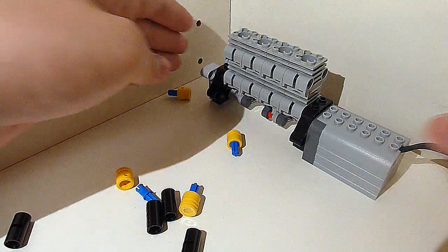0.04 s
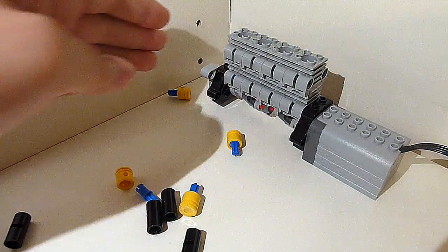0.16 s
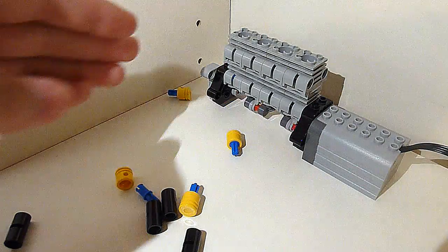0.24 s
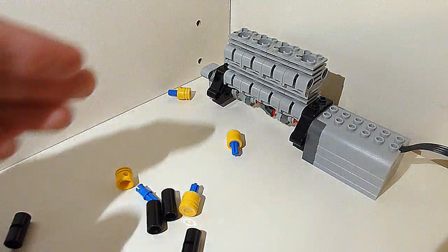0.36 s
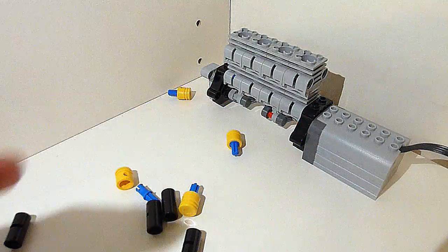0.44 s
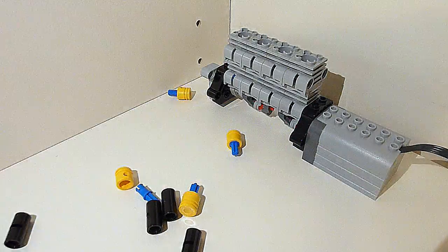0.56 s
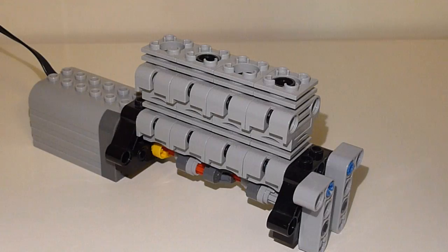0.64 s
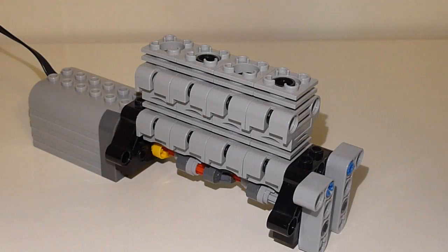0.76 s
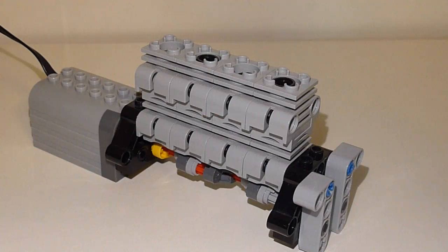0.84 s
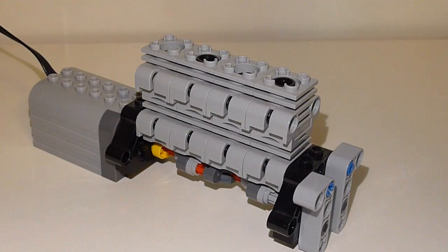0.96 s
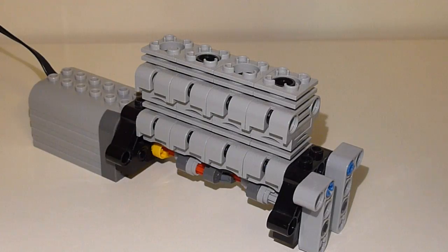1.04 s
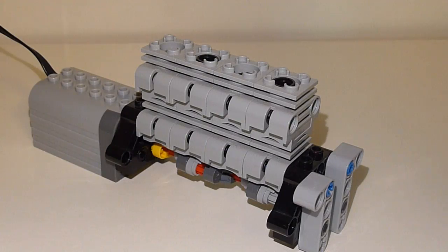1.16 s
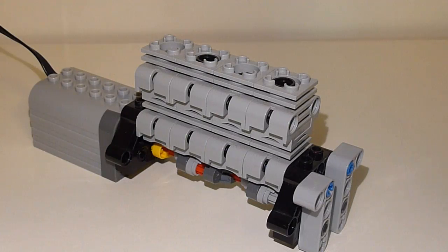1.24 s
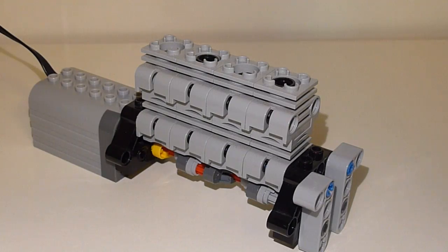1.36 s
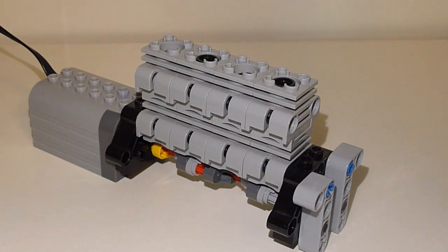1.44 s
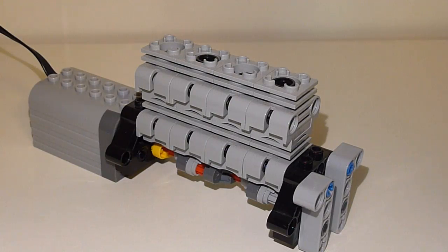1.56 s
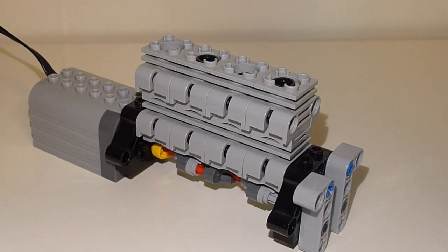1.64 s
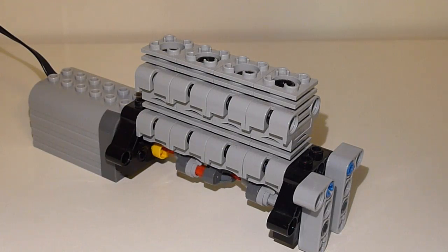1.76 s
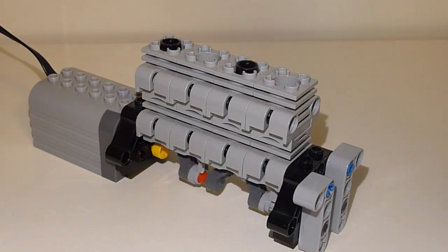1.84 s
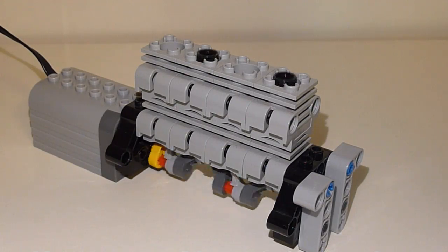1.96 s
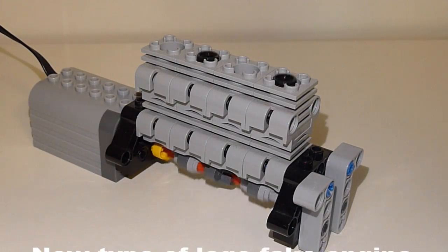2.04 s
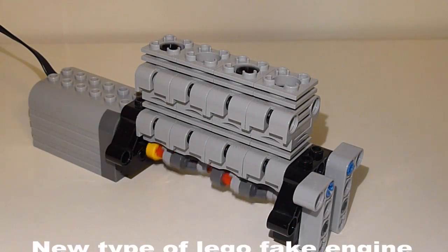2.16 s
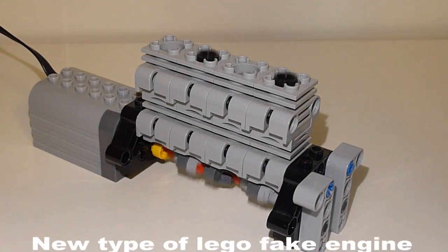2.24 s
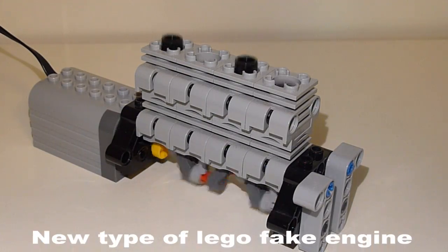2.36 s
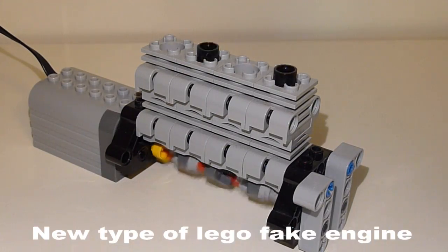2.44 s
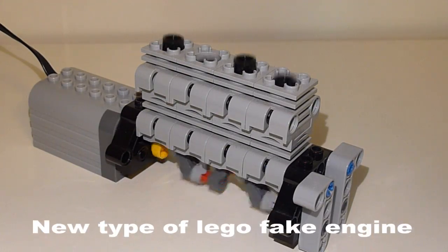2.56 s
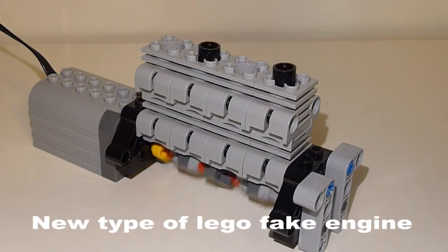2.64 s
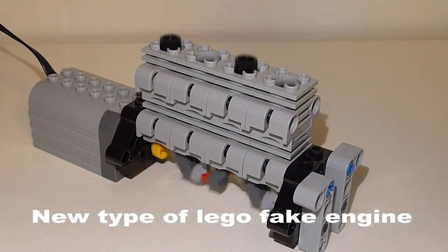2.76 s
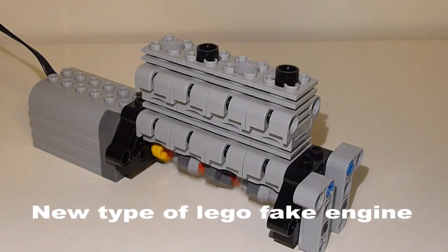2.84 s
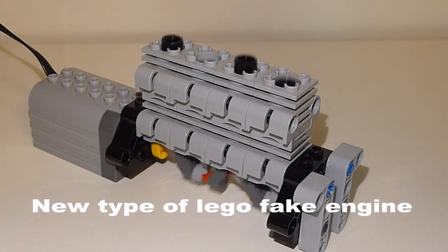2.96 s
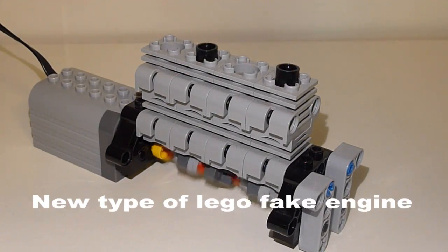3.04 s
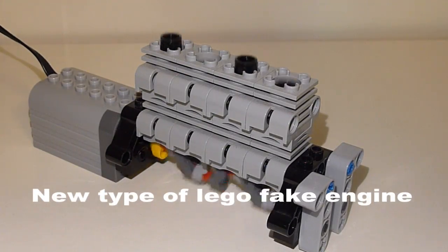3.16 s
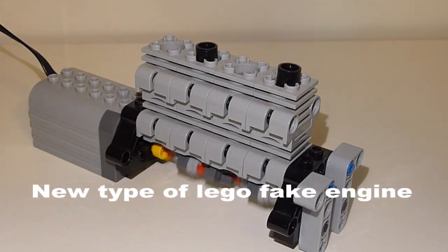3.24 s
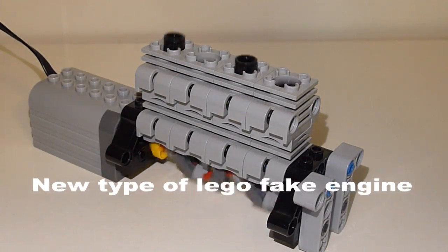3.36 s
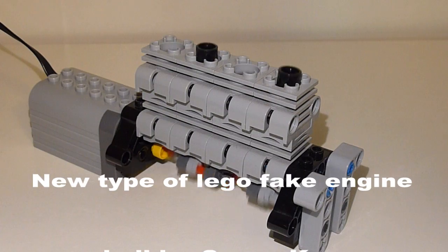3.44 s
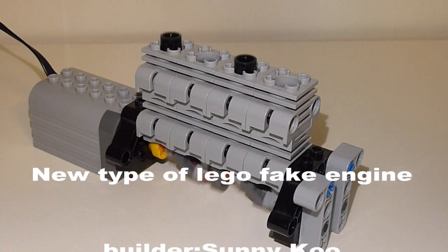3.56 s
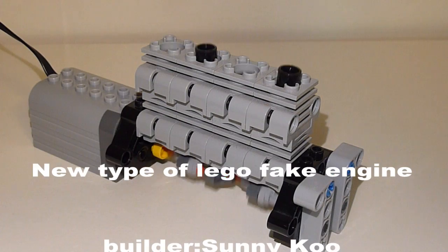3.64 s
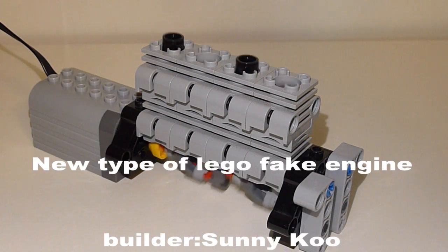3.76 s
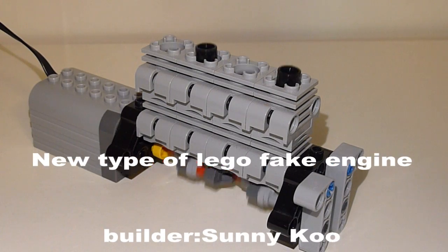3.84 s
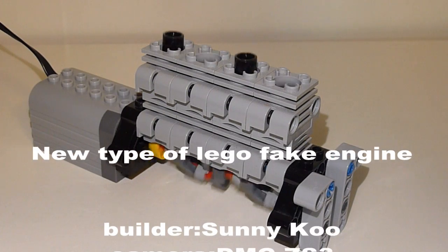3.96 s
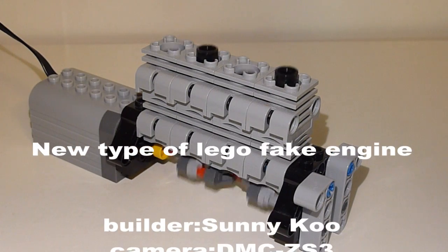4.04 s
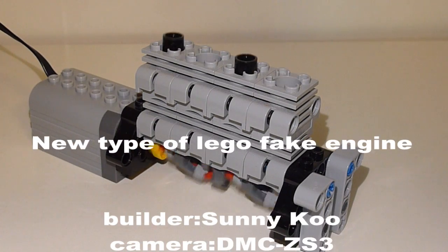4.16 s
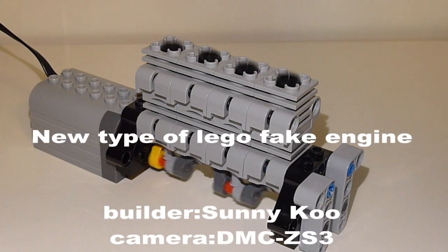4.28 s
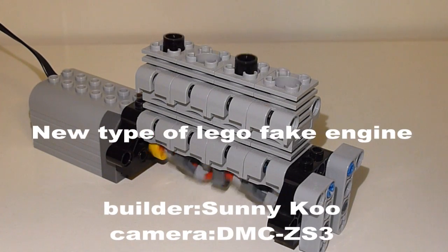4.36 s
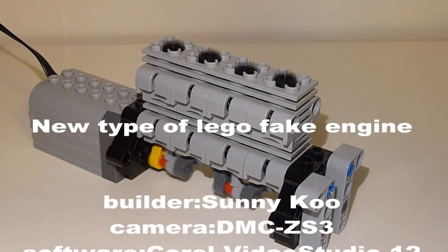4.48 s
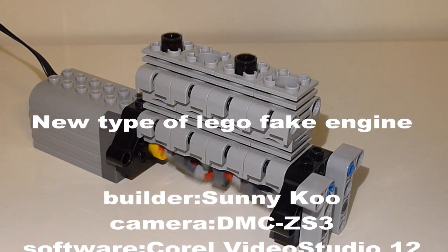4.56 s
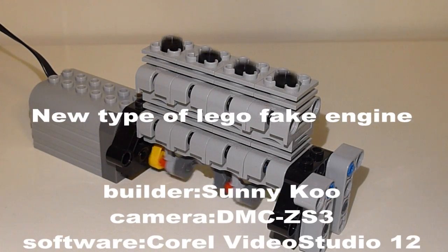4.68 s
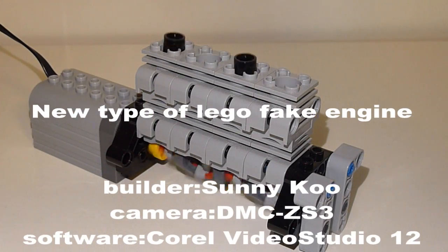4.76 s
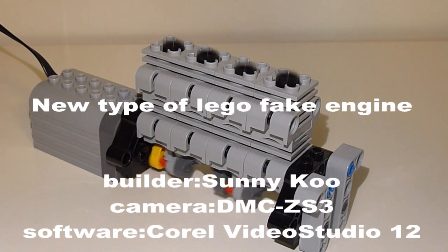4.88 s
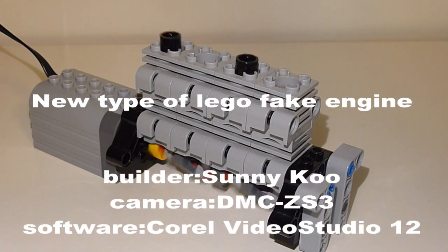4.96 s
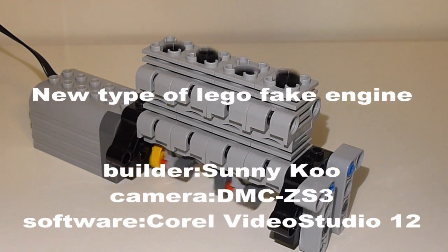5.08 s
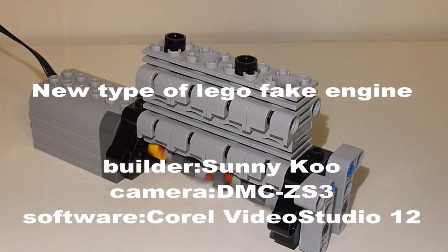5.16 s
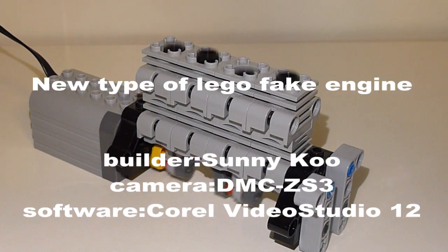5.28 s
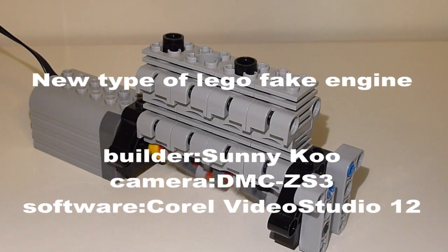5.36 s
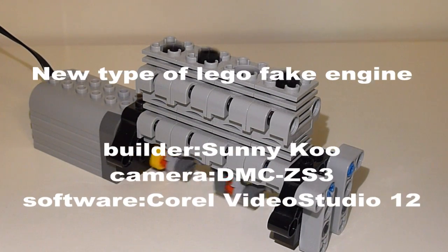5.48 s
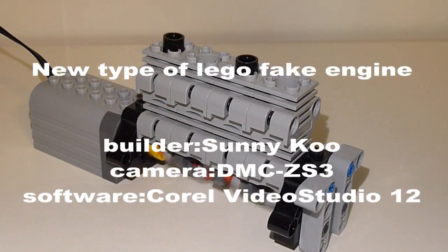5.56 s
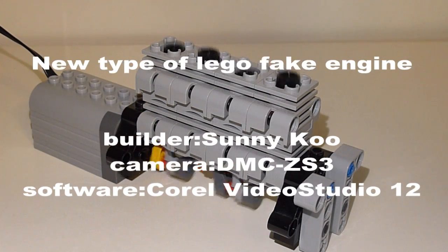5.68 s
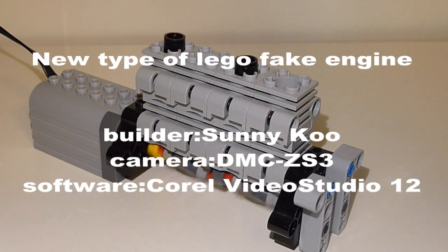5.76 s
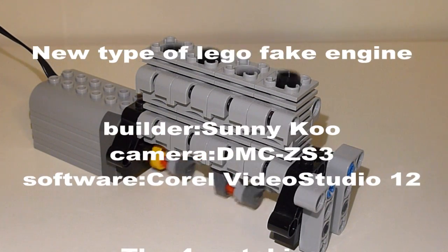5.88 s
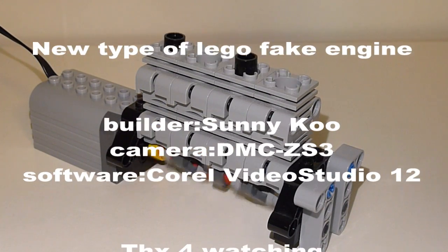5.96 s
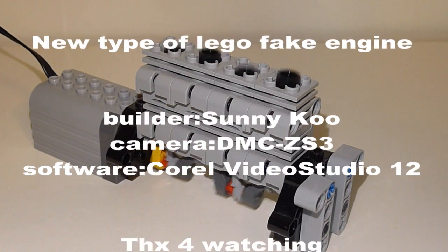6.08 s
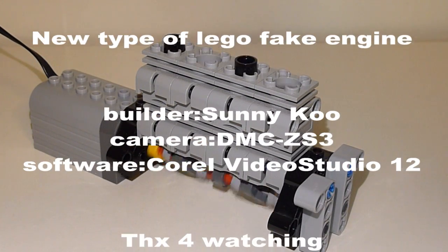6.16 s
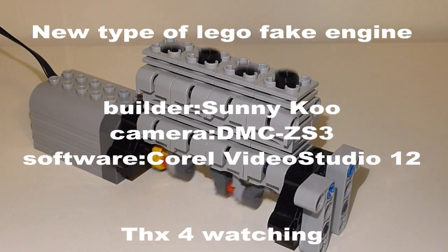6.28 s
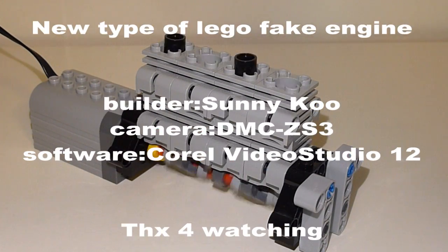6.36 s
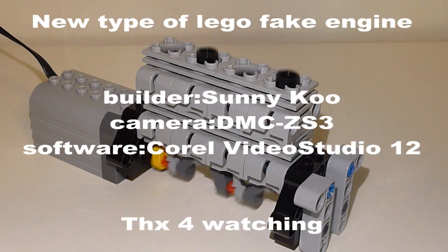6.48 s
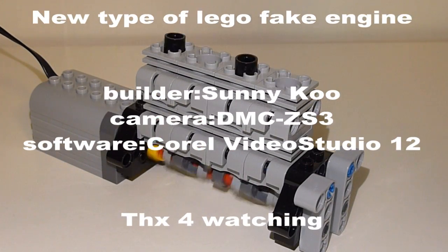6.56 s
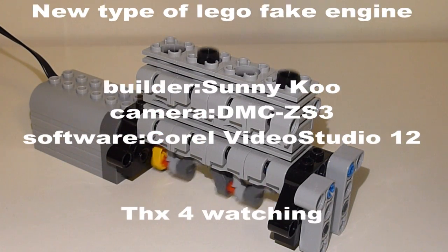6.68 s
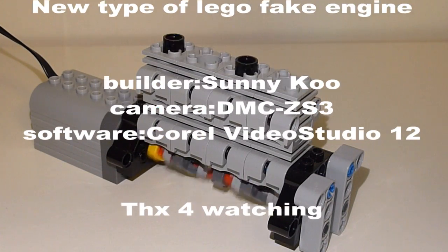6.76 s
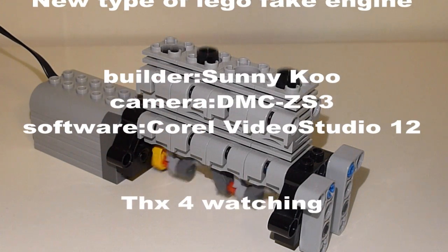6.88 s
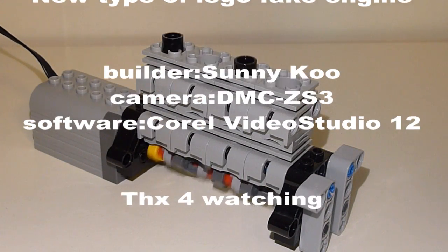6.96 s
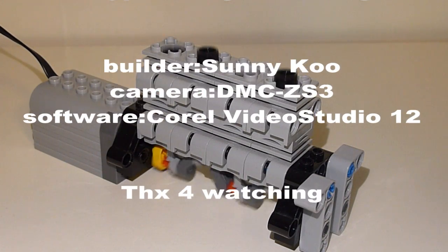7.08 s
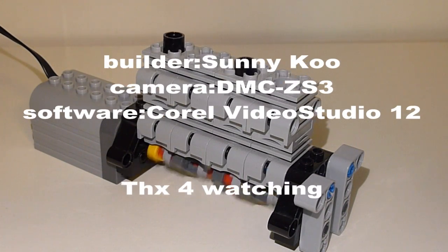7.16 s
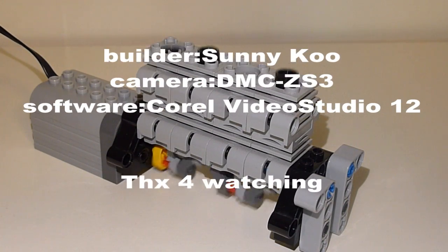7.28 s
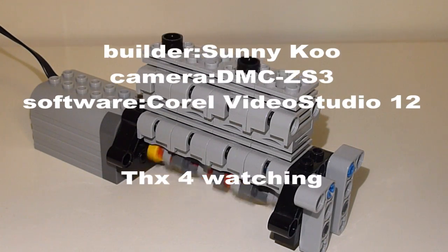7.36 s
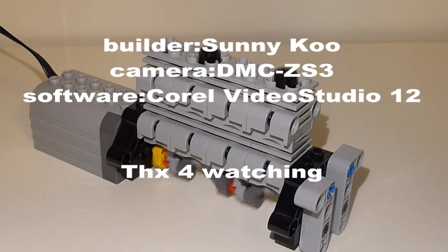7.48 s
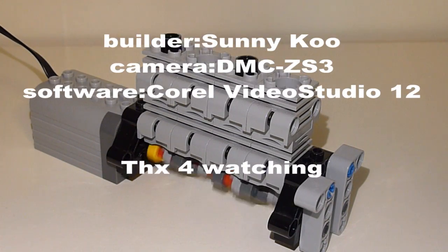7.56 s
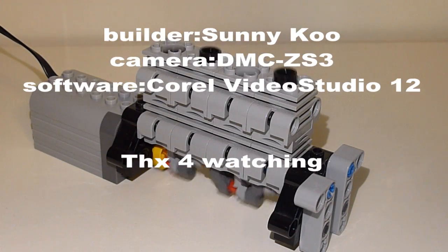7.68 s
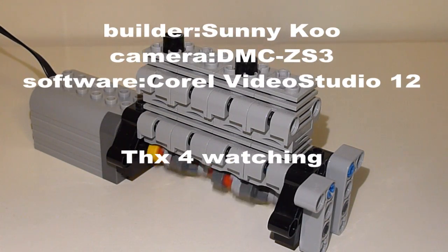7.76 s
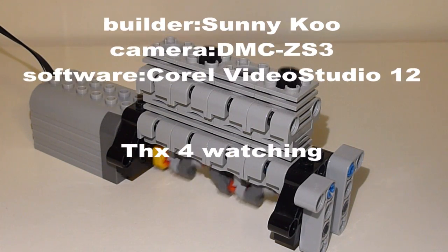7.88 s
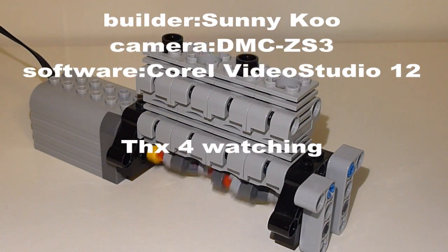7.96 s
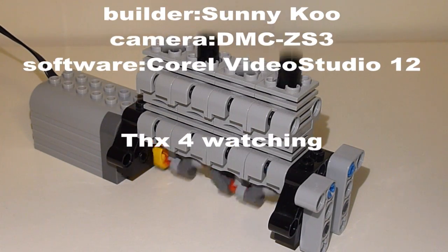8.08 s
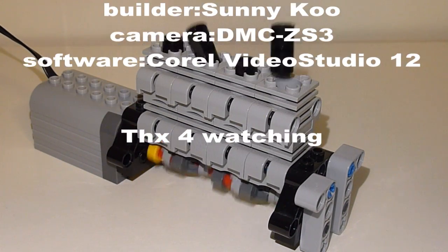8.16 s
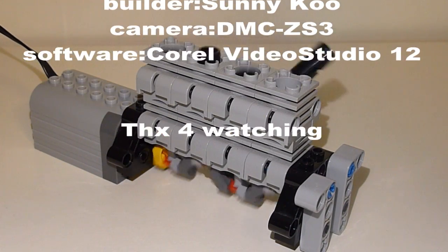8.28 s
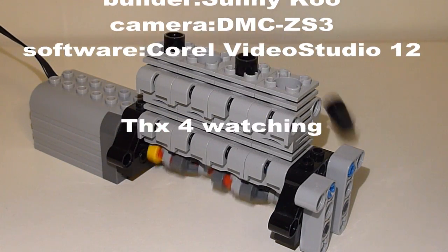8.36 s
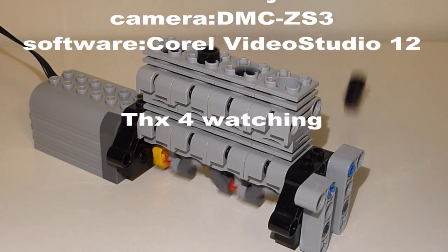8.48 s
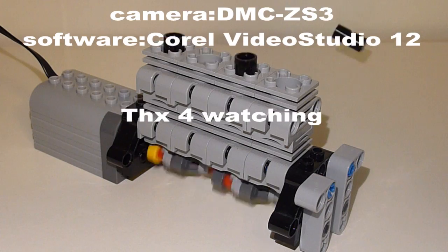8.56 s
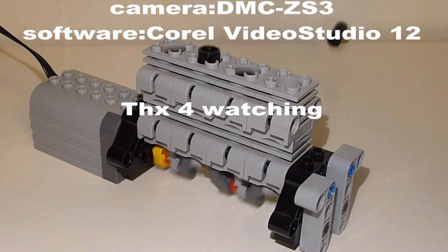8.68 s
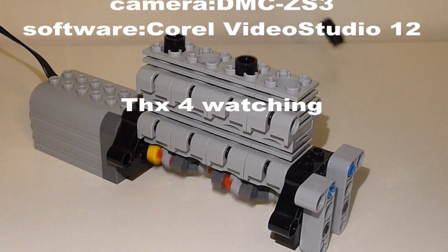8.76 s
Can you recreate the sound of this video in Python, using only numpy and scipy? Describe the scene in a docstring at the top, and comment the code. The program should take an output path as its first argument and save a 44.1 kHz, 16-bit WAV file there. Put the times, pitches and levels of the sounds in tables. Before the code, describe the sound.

Close stereo microphone at a table in a quiet room with faint low hum and hiss. From 0 to 0.7 seconds a small motor turns a plastic engine slowly: soft clacks about ten a second, a scratchy gear whirr with a thin wavering whine, and dull hand knocks near 0.1 and 0.6. It stops, leaving only the room. Around 1.7 a switch clicks a few times; from 1.9 the motor whirs up unevenly while hollow little tocks come from the control until 2.2. By 2.5 the engine is at speed: loud, bright, dry plastic clacks twenty times a second, often doubled by a lighter hit just before, with small ticks between and weak table thumps, over steady gear whirr. This holds with slight irregularity until 8.2, when a piston pops out with a sharp crack, then bounces hard at 8.5, 8.6 and 8.8 while the clatter runs on, rougher, to the end.

```python
"""On a table in a room, close up: a small electric motor turns the crankshaft of a plastic model engine.
It turns slowly, stops, a switch clicks and a control tocks; then the engine runs up and its pistons clack
twenty times a second, until one piston is thrown out and bounces on the table.
Blows are bursts of ticks ringing a body, plus a table thump; motor and room are coloured, patchy noise.
"""
import sys
import numpy as np
from scipy import signal
from scipy.fft import rfft, irfft
from scipy.io import wavfile
from scipy.ndimage import uniform_filter1d

SR = 44100
rng = np.random.default_rng(int(sys.argv[2]) if len(sys.argv) > 2 else 0)


def digitize_waveform(pressure):
    """Quantize a signal to 16-bit integers and store it at the path in sys.argv[1].

    Rows of a 2-D input are taken as channels; values are limited to [-1, 1].
    """
    field = np.atleast_2d(pressure).T
    bounded = np.clip(field, -1, 1)
    quanta = np.round(bounded * 32767).astype(np.int16)
    wavfile.write(sys.argv[1], SR, quanta)


N = 389403

# resonances of the engine block: (frequency [Hz], width [Hz], relative level [dB])
BLOCK_MODES = [(1628, 18.6, 6), (1889, 33, 6), (1994, 54, 3.5), (2268, 42, 3.5), (2640, 246, 2),
               (2860, 74, -0.5), (3250, 84, -3), (3460, 155, -1), (3660, 90, -2), (3816, 44, -1),
               (4140, 56, 3), (4470, 43, 2), (4540, 36, -2), (4770, 66, 0.5), (5180, 200, -2),
               (6046, 134, 1.5), (5770, 150, 1.5), (6560, 95, -2), (10200, 300, -3)]
# resonances of the table: (frequency [Hz], width [Hz], relative level [dB])
TABLE_MODES = [(158, 25, -24), (230, 28, -3), (261.2, 18, 4.5), (287, 22, -5), (377.5, 43, -1.5),
               (490, 13.5, -2.5), (533, 7.2, 6), (785, 89, -6.5), (1041, 37, -7.5)]
# resonances of the control's housing: (frequency [Hz], width [Hz], relative level [dB])
KNOB_MODES = [(1450, 130, 6.5), (2320, 790, -1.5), (3580, 500, 2.5)]


def gain_of(db):
    """Decibels to an amplitude factor."""
    return 10 ** (np.asarray(db) / 20)


def evened(x):
    """Scales to rms 1."""
    return x / np.sqrt(np.mean(abs(x) ** 2) + 1e-20)


def read(points, hz):
    """Reads a spectrum on a log-frequency axis."""
    f, value = np.transpose(points)
    return np.interp(np.log(hz + 1), np.log(f + 1), value)


def causal(db):
    """Minimum-phase response for gains in dB along the last axis, so nothing rings ahead of the blow."""
    log_gain = np.log(gain_of(np.maximum(db, -100)))
    whole = np.concatenate([log_gain, log_gain[..., -2:0:-1]], -1)
    return np.exp(np.conj(signal.hilbert(whole)))[..., :log_gain.shape[-1]]


def ringing_db(modes, hz, between_db):
    """Adds the power of a set of resonances to a flat bed; widths are at least 6 Hz."""
    power = sum(gain_of(2 * db) / (1 + (2 * (hz - f) / max(w, 6)) ** 2) for f, w, db in modes)
    return 10 * np.log10(power + gain_of(2 * between_db))


def paired(a, b, hz):
    """Mixes two spectra into two microphone ports with a frequency-dependent likeness."""
    # (frequency [Hz], left-right correlation [0..1])
    likeness = [(60, 1), (110, 0.97), (200, 0.99), (380, 0.99), (700, 0.96), (1290, 0.88), (2380, 0.83),
                (4400, 0.67), (8120, 0.016), (15000, 1)]
    apart = np.arccos(np.clip(read(likeness, hz), 0, 1)) / 2
    mid, side = a * np.cos(apart), b * np.sin(apart)
    return np.array([mid + side, mid - side])


def noise(tone_db, patchy_db, size=1024):
    """Stereo noise of rms 1 with drifting loud and soft patches; tone_db is a function of Hz."""
    hz = np.fft.rfftfreq(size, 1 / SR)
    a, b, c, d, patches = rng.standard_normal((4 * N // size + 5, len(hz), 5)).T
    patches = uniform_filter1d(patches, size=10, axis=0)
    patches = evened(uniform_filter1d(patches, size=8, axis=1))
    level_db = tone_db(hz)[:, None] + patchy_db * patches
    z = paired(a + 1j * b, c + 1j * d, hz[:, None]) * gain_of(level_db)
    return evened(signal.istft(z, nperseg=size, noverlap=3 * size // 4)[1][:, :N])


def rattles(t, draw, rattle_ms, hurry, rise_s, spread_db, tail_db, tail_s, sudden):
    """Loose parts tick at random, gathered into sharp snaps that die away over a weak tail."""
    snaps_per_s, snap_s, between_snaps = 280, 0.0013, 0.81
    # a larger power holds the rattle and ends it suddenly
    fall = np.exp(-(1000 * t * hurry / np.maximum(rattle_ms, 1)) ** sudden)
    ticks = (draw[0] < .12) * gain_of(-spread_db * np.log(draw[1] + 0.0079)) * np.sign(draw[2] - .5)
    snaps = (draw[4] < snaps_per_s / SR) * draw[2] + (t == 0)  # the first at the blow itself
    snaps = signal.lfilter([1], [1, -np.exp(-1 / (snap_s * SR))], snaps) + between_snaps
    envelope = snaps * fall + gain_of(tail_db) * np.exp(-t / tail_s)
    return ticks * envelope * (1 - np.exp(-t * hurry / rise_s))


def rung(near, side, hz, bright_hz, focus_db, focus_width, body):
    """The rattle rings its body, with a broad emphasis around one pitch."""
    # colour of a clack: (frequency [Hz], relative level [dB])
    clack_tone = [(300, -49.5), (1000, -11), (2000, -9), (4000, 1.5), (6500, -2.5), (10000, -7.5),
                  (12500, -14), (14500, -40.5)]
    tone_db = read(clack_tone, hz) + ringing_db(body, hz, -5.0)
    tone_db = tone_db + focus_db / (1 + (np.log((hz + 1) / bright_hz) / focus_width) ** 2)
    clack = irfft(paired(rfft(near), rfft(side), hz) * causal(tone_db))
    power = uniform_filter1d(clack.mean(0) ** 2, size=100, axis=1)
    return clack / (2.4 * np.sqrt(power.max(1, keepdims=True)))  # the strongest 2 ms sets the level


def thumps(t, hz, draw, push_s, dull_hz, damp_s):
    """A push of random grain swells over some ms, as the table takes time to move, and rings its modes."""
    push = (draw - .5) * t * np.exp(-t / push_s)
    tone_db = ringing_db(TABLE_MODES, hz, -51) - 40 * (hz < 100)
    tone_db = tone_db - 10 * np.log10(1 + (hz / dull_hz) ** 6)  # soft blows move only the low modes
    thump = irfft(rfft(push) * causal(tone_db)) * np.exp(-t / damp_s)  # a hand on the wood damps it
    return thump / abs(thump).max(1, keepdims=True)


def hits(rows, rise_s, spread_db, focus_db, focus_width, tail_db, tail_s, thump_db, trim_db, pan_db,
         push_s, linger, dull_hz=2000, damp_s=.3, sudden=1.04, body=BLOCK_MODES):
    """Each hit is a short rattle ringing its body, then a slower thump in the table."""
    s, db, bright_hz, low_db, rattle_ms = np.array(rows).T[:, :, None]
    t, hz = np.arange(4096) / SR, np.fft.rfftfreq(4096, 1 / SR)
    draw = rng.random((len(rows), 5, 4096)).transpose(1, 0, 2)
    hurry = gain_of(linger * (np.median(db) - db))  # light blows start and settle sooner
    near = rattles(t, draw, rattle_ms, hurry, rise_s, spread_db, tail_db, tail_s, sudden)
    side = near * np.sign(draw[3] - .5)
    clack = rung(near, side, hz, bright_hz, focus_db, focus_width, body)
    thump = thumps(t, hz, draw[3], push_s, dull_hz, damp_s)
    sway_db = pan_db + 0.98 * (draw[1, :, :1] - .5)  # each part sits elsewhere along the block
    sound = clack * gain_of([sway_db / 2, -sway_db / 2]) + gain_of(low_db + thump_db) * thump
    sound = gain_of(db + trim_db) * sound
    out = np.zeros((2, N + 4096))
    for k, start in enumerate(np.round(s[:, 0] * SR).astype(int)):
        out[:, start:start + 4096] += sound[:, k]
    return out[:, :N]


def strokes():
    """Rows for hits(), the listed clacks plus an ordinary one at each stroke left free, and leads in ms."""
    # clacks that stand out: the slow run, the run-up, the hardest at full speed, the uneven ones with a
    # piston gone: (time [s], level before trim [dB], brightest [Hz], nominal rattle [ms],
    # lead of the lighter piston [ms], negative if it trails)
    standouts = np.array([(0.0044, -26.5, 3640, 5.8, -1), (0.0836, -34, 3620, 9.4, 2),
                          (0.193, -29.5, 3180, 8, 1.5), (0.2755, -28.5, 3190, 9.6, -2),
                          (0.378, -25, 3680, 5.8, 0.5), (0.4813, -33, 4010, 10, -2.5),
                          (0.56, -32, 3210, 12, -0.5), (0.6712, -30, 3170, 9, -4),
                          (1.871, -35, 2900, 5.2, 0.5), (2.121, -31, 5700, 8, -3), (2.167, -28, 3000, 5, 2),
                          (2.3106, -36, 2950, 11, 2.5), (2.3804, -34, 4540, 13, 0),
                          (2.438, -20.5, 3700, 7.7, 0), (2.4733, -26.5, 2570, 14, -1),
                          (2.498, -22.5, 2820, 12, 3.5), (2.5509, -17.5, 3930, 11, 5),
                          (2.5993, -17.5, 4630, 7.9, 5), (2.7063, -17.5, 3350, 8.8, 9),
                          (2.75, -18, 3920, 10, 4.5), (2.8064, -16.5, 5990, 6.9, 8),
                          (2.8518, -15.5, 3420, 5.1, 1.5), (2.8997, -19, 4780, 7, -0.5),
                          (2.9488, -17.5, 3960, 6.1, 3), (2.996, -19.5, 4200, 14, 8.5),
                          (3.049, -17.5, 4910, 7, 3.5), (3.1033, -17, 5920, 6.5, 5),
                          (3.2011, -17, 4370, 7.0, 2.5), (3.3017, -20, 3530, 12, 7.5),
                          (3.397, -16, 4180, 11, 0.0), (3.4463, -17, 6270, 8.2, 1),
                          (3.501, -14, 6010, 4.7, 2.5), (3.5458, -21, 3120, 9.4, 12),
                          (3.5947, -17, 4700, 6.6, 6.5), (3.6452, -18, 4570, 6.9, 5),
                          (3.6949, -18.5, 4520, 12, 9), (3.7437, -15.5, 3680, 6.1, 2.5),
                          (3.798, -18, 3010, 9.0, 8.5), (3.8455, -15, 3850, 5.1, 4),
                          (3.896, -18.5, 3080, 6.6, 2.5), (3.9422, -18, 4570, 7.4, 9),
                          (4.0463, -16, 3940, 5.2, 4.5), (4.0978, -18, 5880, 6.1, 11),
                          (4.147, -15.5, 4470, 8.1, 4), (4.193, -15, 4160, 4.1, 4.5),
                          (4.3436, -16, 5960, 10, 0.5), (4.4424, -18.5, 3750, 8.7, 9),
                          (4.4942, -18.5, 4600, 9.1, 4.5), (4.5434, -15.5, 3620, 7.4, 4.5),
                          (4.5942, -15.5, 3400, 8.4, 3), (4.6427, -20.5, 3920, 9.1, 4),
                          (4.6947, -16.5, 4700, 8.5, 0.0), (4.7432, -18, 3680, 9.6, 6),
                          (4.791, -17, 4160, 11, -0.5), (4.8473, -19, 4740, 12, 10),
                          (4.8924, -17, 4590, 6.9, 5), (4.944, -21.0, 4130, 13, 6.1),
                          (4.991, -15, 4150, 9.7, 0.0), (5.192, -19, 4200, 9.2, 2),
                          (5.2935, -17.5, 2860, 14, 1.5), (5.3409, -17, 4360, 9.1, 1),
                          (5.397, -16, 3490, 6.1, 6), (5.44, -17, 3730, 7.4, 4),
                          (5.4914, -20.5, 2690, 12, 4), (5.5428, -17.5, 3660, 7.6, 8.5),
                          (5.5926, -15.0, 4650, 7.8, 0.0), (5.6414, -16, 4500, 5.1, 7),
                          (5.6905, -18.5, 4160, 9.8, 8.5), (5.7886, -19.5, 2710, 15, 8.5),
                          (5.8937, -16, 4200, 10, 3.5), (5.9384, -18.5, 3700, 14, 3),
                          (5.9933, -16.5, 5880, 6.8, 5), (6.0379, -17, 4420, 8.2, 5.1),
                          (6.0893, -15, 4180, 6.6, 0.5), (6.1426, -17.5, 5080, 8.8, 4.9),
                          (6.1904, -17.5, 4160, 6.1, 2), (6.2387, -17, 4330, 7.9, 9.5),
                          (6.2966, -19.5, 3370, 6.4, 11.5), (6.338, -19.5, 2760, 12, 5.5),
                          (6.3884, -20, 3600, 5.6, 12), (6.4416, -15, 3790, 5.9, 10),
                          (6.487, -17, 4240, 7.9, 10.0), (6.5891, -16.5, 5790, 7.4, 4),
                          (6.636, -16.5, 3460, 8.1, 0.5), (6.6907, -17, 5750, 9.6, 0.5),
                          (6.7888, -17, 3480, 7.3, 2), (6.837, -19.5, 4480, 8.0, 5.3),
                          (6.8884, -17.5, 4220, 8.6, 1), (6.9353, -18, 5810, 6.2, 8.5),
                          (6.9889, -19.5, 2860, 11, 3.5), (7.0387, -17, 4480, 7.4, 5.0),
                          (7.089, -17, 4220, 8.2, 2), (7.1364, -18.5, 4390, 10.0, 6),
                          (7.1858, -17, 4160, 7.1, -0.5), (7.2352, -17, 5840, 10.4, 5),
                          (7.2889, -14.5, 4200, 5.8, 1), (7.336, -17.5, 2760, 9.1, 4),
                          (7.389, -18, 3380, 7.5, 5.5), (7.4847, -16, 4170, 8.9, 0.0),
                          (7.5361, -16, 4480, 7, 2), (7.5907, -18.5, 4670, 8.3, 2.5),
                          (7.638, -17.5, 3670, 7.9, 7), (7.793, -15, 4000, 3.5, 7.5),
                          (7.837, -15.5, 2800, 6.1, 9.5), (8.0352, -17, 4870, 9.1, 2.5),
                          (8.193, -15, 4770, 9.4, 7), (8.2966, -19, 3000, 66, 2),
                          (8.332, -19, 4230, 12, 0.5), (8.3883, -19.5, 4640, 7.7, 2.5),
                          (8.4368, -17.5, 3620, 15, 3), (8.4814, -19, 4110, 11, -1),
                          (8.5807, -22.5, 2900, 11, 3), (8.6391, -16, 4070, 9.4, 1),
                          (8.6808, -18.5, 3880, 8.1, -3.5), (8.741, -20.5, 4440, 13, 6),
                          (8.7834, -20, 2730, 9.4, 2)])
    # range in which an ordinary clack is brightest at one block mode: (lowest [Hz], highest [Hz])
    lowest_hz, highest_hz = (2600, 6190)
    first_stroke_s, stroke_s, count = 2.548, .04986, 113  # at full speed a pair of pistons drops at every stroke
    loose_s = .0015  # play in the cranks scatters the timing
    usual_db, scatter_db = -18.5, 1.0  # level of an ordinary clack before trim
    rattle_ms, shorten = 12.7, 0.5  # a harder clack spends the same energy in a shorter rattle
    average_lead_ms = 2.2  # two pistons share a stroke; the lighter lands this much earlier on average
    under_db, under_scatter_db = -19, 3  # thump below the clack, before its own trim

    due = first_stroke_s + stroke_s * np.arange(count)
    late, hard = rng.standard_normal((count, 2)).T
    pick, ahead = rng.random((count, 2)).T
    modes = np.array([f for f, _, _ in BLOCK_MODES if lowest_hz < f < highest_hz])
    lead_ms = 2 * average_lead_ms * ahead
    usual = np.transpose([due + loose_s * late + lead_ms / 1000,
                          usual_db + scatter_db * hard,
                          modes[(pick * len(modes)).astype(int)],
                          rattle_ms * gain_of(-shorten * scatter_db * hard),
                          lead_ms])
    free = abs(due[:, None] - standouts[:, 0]).min(1) > stroke_s / 2
    rows = np.concatenate([standouts, usual[free]])
    thump_db = under_db + under_scatter_db * np.clip(rng.standard_normal(len(rows)), -2, 1.5)
    thump_db -= (rows[:, 1] - usual_db).clip(0)  # a harder clack does not thump harder
    rows = np.insert(rows, 3, thump_db, axis=1)[np.argsort(rows[:, 0])]
    return rows[:, :5], rows[:, 5]


def piston_clacks(clacks):
    """The heavier piston of each stroke strikes: a held, suddenly ending rattle in the block."""
    return hits(clacks, rise_s=0.00043, spread_db=1.2, focus_db=5.5, focus_width=0.09, tail_db=-19,
                tail_s=0.021, thump_db=1.5, trim_db=-0.5, pan_db=1.4, push_s=0.0047, linger=0.15,
                sudden=1.5)


def forerunners(clacks, lead_ms):
    """The lighter piston of a pair lands a few ms before the main clack, or after it if it trails."""
    rows = clacks.copy()
    rows[:, 0] -= lead_ms / 1000
    rows[:, 1] -= 60 * (abs(lead_ms) < 1.2)  # a pair that lands together is one clack
    rows[:, 2] *= gain_of(2.0 * rng.standard_normal(len(rows)))
    rows[:, 4] = 2.1 * abs(lead_ms)
    return hits(rows, rise_s=0.00023, spread_db=1.5, focus_db=4.5, focus_width=0.089, tail_db=-35,
                tail_s=.012, thump_db=-1.5, trim_db=-6.5, pan_db=1.3, push_s=0.0039, linger=.01)


def rebounds(clacks):
    """About half a stroke after each clack the piston is picked up again with a lighter tick."""
    rows = clacks.copy()
    gap = np.minimum(np.diff(rows[:, 0], append=N / SR), .1)
    chance = rng.standard_normal((len(rows), 2))
    rows[:, 0] += gap * np.clip(.48 + .08 * chance[:, 0], 0, 1)
    rows[:, 1] += 1.0 * chance[:, 1]
    return hits(rows, rise_s=0.00035, spread_db=4.5, focus_db=3.5, focus_width=0.2, tail_db=-44,
                tail_s=0.018, thump_db=-26, trim_db=-14.0, pan_db=3.0, push_s=0.0031, linger=0.26)


def thrown_piston():
    """A loose piston pops out and bounces, ringing its own modes and thumping the table."""
    # (time [s], level before trim [dB], brightest [Hz], thump re clack before trim [dB],
    # nominal rattle [ms])
    bounces = [(8.2153, -11, 4600, -10.5, 2.9), (8.5097, -27, 3500, -20, 1.5), (8.5207, -8, 3040, -21, 2.6),
               (8.536, -17.5, 4100, -20, 6.5), (8.6185, -10.5, 3900, -21, 4.2), (8.7668, -13, 2990, -16, 5)]
    # resonances of the loose piston on the table: (frequency [Hz], width [Hz], relative level [dB])
    piston_modes = [(1310, 170, 4.5), (1840, 70, 12), (1980, 73, 8.5), (2690, 90, 2.5), (2990, 71, 2),
                    (3270, 70, -8), (3700, 74, -5), (4220, 90, 0.5), (4600, 100, -3), (5650, 110, -14),
                    (6160, 220, -4), (10000, 360, -13)]
    return hits(bounces, rise_s=0.00047, spread_db=1.5, focus_db=7.5, focus_width=0.16, tail_db=-12.0,
                tail_s=0.018, thump_db=-1.5, trim_db=1.0, pan_db=0.0, push_s=0.0034, linger=.01,
                dull_hz=910, body=piston_modes)


def lulls(landings):
    """A bump ahead of each landing: the cranks run unloaded just before each piston drops."""
    drops = np.bincount(np.round(landings * SR).astype(int), minlength=N)
    lull = signal.oaconvolve(drops, np.hanning(1200)[:700])[700:]
    return np.append(lull, 0)[:N]


def thin_whine():
    """The slow motor sings one thin tone, wavering in pitch and level."""
    whine_hz, whine_db, waver_db = 1873, -60.5, 3.5
    waver = evened(uniform_filter1d(rng.standard_normal((2, N)), size=1500))
    tone = np.sin(2 * np.pi * np.cumsum(whine_hz * (1 + .003 * waver[0])) / SR)
    return np.sqrt(2) * gain_of(whine_db + waver_db * waver[1]) * tone


def motor(landings):
    """Gear teeth scrape in the block, the casing or shelf colours the whirr, the frame shakes the table."""
    # motor and gears, slow run then restart: (time [s], whirr before pan and lulls [dB],
    # rumble through the table [dB])
    runs = [
        [(0, -44, -50.5), (.13, -49.5, -49.5), (.45, -45.5, -50), (.56, -47, -50), (.6, -49, -40.5),
         (.66, -42.5, -47), (.7, -46.5, -50), (.73, -46.5, -59)],
        [(1.87, -56.5, -60), (1.95, -50, -55), (2.12, -46, -47.5), (2.19, -44, -51), (2.245, -50.5, -50),
         (2.29, -42, -46.5), (2.42, -38, -51.5), (2.6, -38, -45.5), (5.2, -38.5, -47.5), (8.1, -38.5, -47),
         (8.23, -36.5, -48), (8.33, -38, -43), (8.83, -37.5, -49)],
    ]
    # colour of the scraping gears: (frequency [Hz], relative level [dB])
    gear_tone = [(300, -25), (1000, -8.5), (1500, -7), (3000, -1.5), (4500, -4), (6000, -1.5), (10000, -7),
                 (12500, -18.5), (14500, -82)]
    # resonances of the motor casing: (frequency [Hz], width [Hz], relative level [dB])
    casing_modes = [(2930, 80, 4), (3620, 110, 0.5), (5830, 130, 3.5), (10000, 390, -8)]
    # the first stand, a corner of a shelf, colours the whirr:
    # (frequency [Hz], width [Hz], relative level [dB])
    shelf_modes = [(1160, 46, 8.5), (1860, 79, 6.5), (2540, 23, 4), (3230, 60, 1), (3620, 97, -2.5),
                   (3960, 58, -4), (4600, 60, -13), (5000, 42, -1), (5960, 250, -4)]
    # the quieter the gears, the larger the share of the bare motor
    bare_at_speed, bare_per_db, full_db, bare_on_shelf = 0.08, 0.09, -38.5, 0.57

    t = np.arange(N) / SR
    s, whirr_points_db, rumble_points_db = np.concatenate(runs).T
    whirr_db, rumble_db = np.interp(t, s, whirr_points_db), np.interp(t, s, rumble_points_db)
    stop, restart = runs[0][-1][0], runs[1][0][0]
    running = uniform_filter1d(1. * ((t < stop) | (t > restart)), 200)
    slow = t < stop + .1
    bare = np.clip(bare_at_speed + bare_per_db * (full_db - whirr_db), 0, 1)
    bare = np.where(slow, bare_on_shelf, bare)

    teeth = gain_of(1.55 * evened(uniform_filter1d(rng.standard_normal(N), 90)))
    gears = noise(lambda hz: read(gear_tone, hz) + ringing_db(BLOCK_MODES, hz, -3.5), patchy_db=1.5)
    casing = noise(lambda hz: ringing_db(casing_modes, hz, -8.5) + read(gear_tone, hz), patchy_db=2.0)
    shelf = noise(lambda hz: ringing_db(shelf_modes, hz, -30) + read(gear_tone, hz), patchy_db=-0.5)
    shake = noise(lambda hz: ringing_db(TABLE_MODES, hz, -50), patchy_db=2.5, size=4096)

    whirr = np.sqrt(1 - bare) * evened(teeth * gears) + np.sqrt(bare) * np.where(slow, shelf, casing)
    whirr *= gain_of(-5.5 * lulls(landings))
    whirr *= gain_of([[.6], [-.6]]) * gain_of(whirr_db)  # slightly to the left
    whirr += thin_whine() * slow
    return running * (whirr + gain_of(rumble_db) * shake)


def dial_tocks():
    """Hollow tocks in the housing as the control is turned up."""
    # (time [s], level before trim [dB], brightest [Hz], thump re tock before trim [dB],
    # nominal rattle [ms])
    tocks = [(1.9849, -31, 1440, -24, 3), (2.0035, -21, 1480, -16, 4.2), (2.0398, -32, 1420, -9, 3.2),
             (2.0514, -33, 1450, -13, 3), (2.0985, -20.5, 1420, -8, 3.1), (2.1206, -34, 1360, -6, 3),
             (2.1344, -32, 1420, -2, 3), (2.16, -28.5, 1400, -3, 2.3), (2.191, -32, 1450, -10, 3),
             (2.2109, -35, 1420, -2, 3), (2.2244, -35, 1450, -0.5, 3)]
    return hits(tocks, rise_s=0.00092, spread_db=4.5, focus_db=25.5, focus_width=0.38, tail_db=-14,
                tail_s=0.013, thump_db=-3.0, trim_db=-1.0, pan_db=3.0, push_s=0.008, linger=.01,
                dull_hz=325, body=KNOB_MODES)


def power_switch():
    """The power switch clicks over, ringing the housing of the control."""
    # (time [s], level before trim [dB], brightest [Hz], thump re click before trim [dB],
    # nominal rattle [ms])
    clicks = [(1.6875, -28.5, 1430, -18, 5), (1.714, -30, 1560, -5, 5.8), (1.7512, -28.5, 1370, -9, 5.5),
              (1.7643, -42, 1690, 4, 4.5)]
    return hits(clicks, rise_s=.0003, spread_db=2.5, focus_db=19.0, focus_width=0.37, tail_db=-3,
                tail_s=0.017, thump_db=4.0, trim_db=-1.5, pan_db=4.5, push_s=0.0041, linger=.01,
                dull_hz=325, body=KNOB_MODES)


def hand_knocks():
    """A hand leaves the table: dull, quickly damped knocks with no ringing body."""
    # (time [s], level before trim [dB], brightest [Hz], thump re knock before trim [dB],
    # nominal rattle [ms])
    knocks = [(0.0995, -30, 1250, 6.5, 2.8), (0.1235, -44, 1800, 12, 4), (0.582, -35, 1050, -4, 8.5),
              (0.5949, -38, 1100, 8, 4), (0.616, -37, 1150, -4, 9.5), (0.6344, -38, 1130, 11, 3.7),
              (0.6537, -42.5, 1130, 12, 5.1), (0.672, -47, 1130, 9, 4)]
    return hits(knocks, rise_s=0.00075, spread_db=6.5, focus_db=33.0, focus_width=0.69, tail_db=-7,
                tail_s=0.014, thump_db=-3.5, trim_db=1.0, pan_db=-.6, push_s=0.00092, linger=.01,
                dull_hz=380, damp_s=0.011, body=[])


def room():
    """Low steady hum of the room, standing in a few modes, thinning into faint hiss."""
    # resonances of the room: (frequency [Hz], width [Hz], relative level [dB])
    room_modes = [(87.7, 9.8, -1), (166, 20.4, -2), (245.4, 34, -3.5), (330, 26, -7.5), (472, 44, -2.5),
                  (920, 27, -7.5), (1070, 230, -13.5), (3320, 36, -15.5)]
    # colour of the room: (frequency [Hz], relative level per Hz [dB])
    room_tone = [(20, -28), (45, -9.5), (300, -26.5), (800, -18), (1500, -20.5), (3000, -24.5),
                 (5000, -38.5), (6500, -41.5), (12500, -51.5), (15000, -55)]
    room_db = -48

    def tone_db(hz):
        modes_db = 2 * ringing_db(room_modes, hz, -90) - (hz / 1500) ** 2
        return 10 * np.log10(gain_of(2 * read(room_tone, hz)) + gain_of(modes_db))

    return gain_of(room_db) * noise(tone_db, patchy_db=1.9, size=4096)


def scene():
    """All sources at the microphone."""
    clacks, lead_ms = strokes()
    landings = clacks[:, 0] - lead_ms.clip(0) / 1000  # the earlier piston of each pair
    engine = piston_clacks(clacks) + forerunners(clacks, lead_ms) + rebounds(clacks)
    handling = dial_tocks() + power_switch() + hand_knocks()
    return engine + thrown_piston() + motor(landings) + handling + room()


def record(dry):
    """The microphone housing cuts notches and drops the deepest bass; then the band limit."""
    # broad dip of the microphone: (centre [Hz], half width [Hz], depth [dB])
    dip_hz, dip_width_hz, dip_db = (8024, 753, 35.6)
    # narrow cancellations between the ports and the housing: (centre [Hz], half width [Hz])
    cancellations = [(5420, 150), (10580, 200)]
    edge_hz = 15750
    hz = np.fft.rfftfreq(4096, 1 / SR)
    colour_db = -dip_db * np.exp(-((hz - dip_hz) / dip_width_hz) ** 2)
    for f, w in cancellations:
        colour_db += 10 * np.log10(1 - .98 / (1 + ((hz - f) / w) ** 2))
    heard = signal.oaconvolve(dry, irfft(causal(colour_db))[None, :2048])[:, :N]
    heard = signal.sosfilt(signal.butter(4, 38, "high", fs=SR, output="sos"), heard)
    band = signal.firwin(511, edge_hz, window=("kaiser", 9), fs=SR)
    return signal.oaconvolve(heard, band[None], "same")


dry = scene()
out = record(dry)
digitize_waveform(out)
```